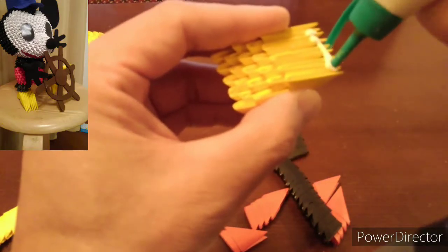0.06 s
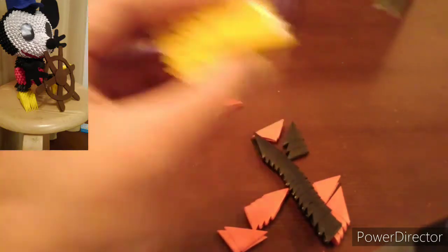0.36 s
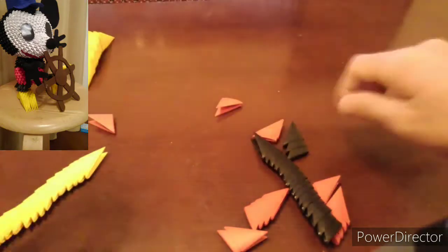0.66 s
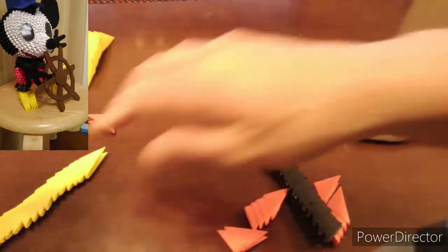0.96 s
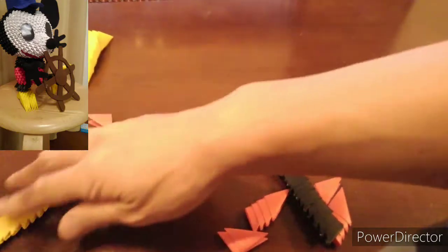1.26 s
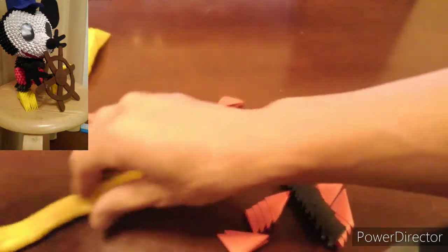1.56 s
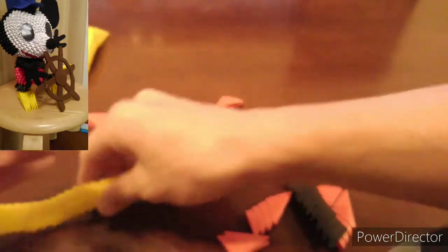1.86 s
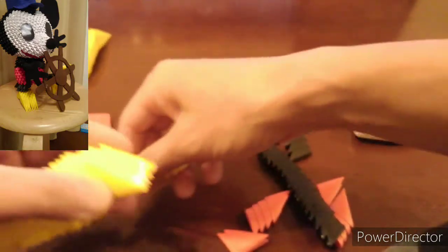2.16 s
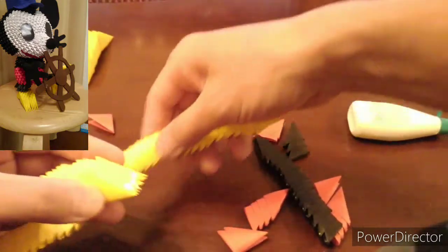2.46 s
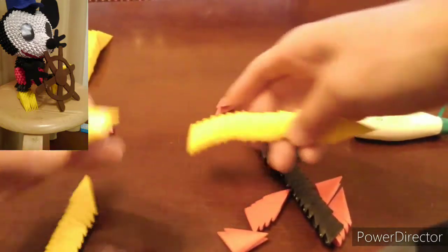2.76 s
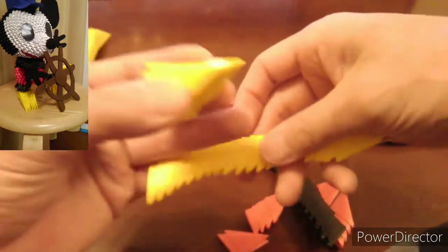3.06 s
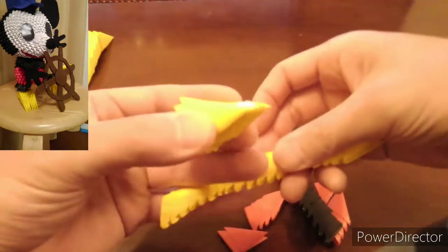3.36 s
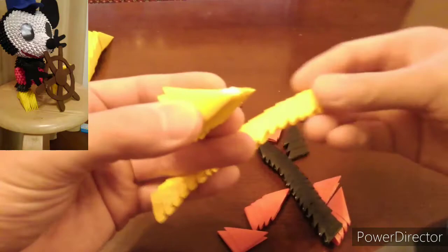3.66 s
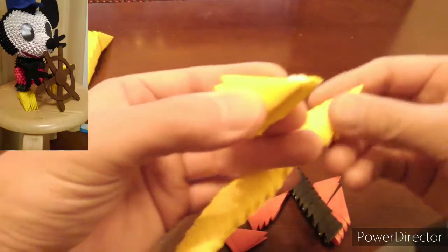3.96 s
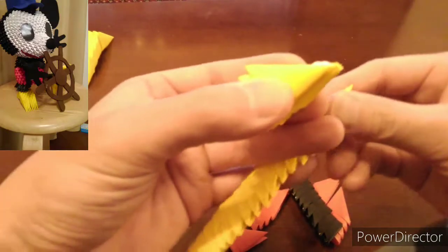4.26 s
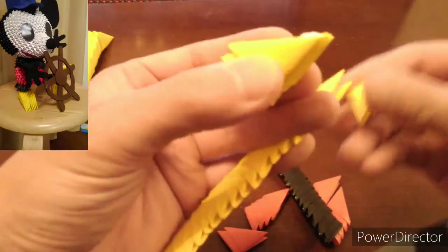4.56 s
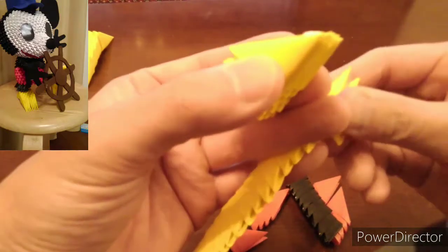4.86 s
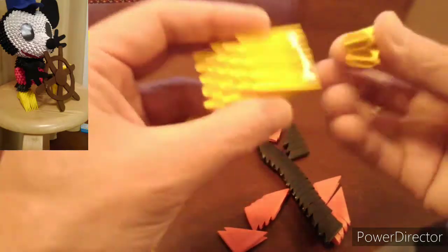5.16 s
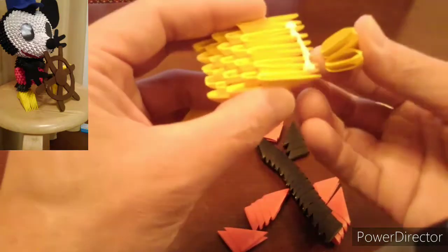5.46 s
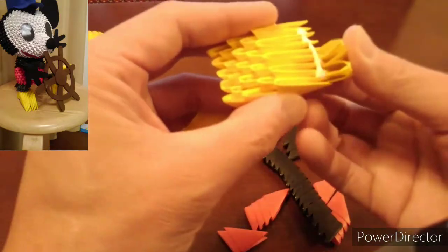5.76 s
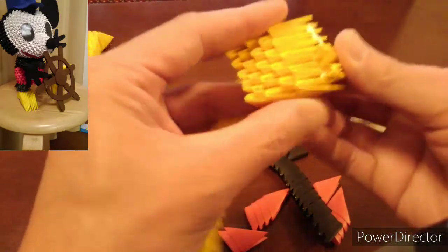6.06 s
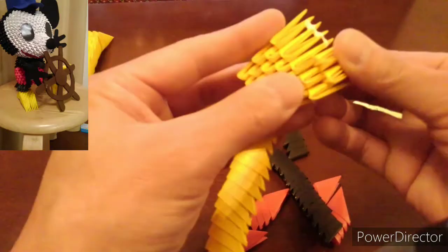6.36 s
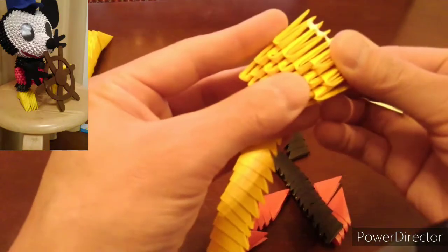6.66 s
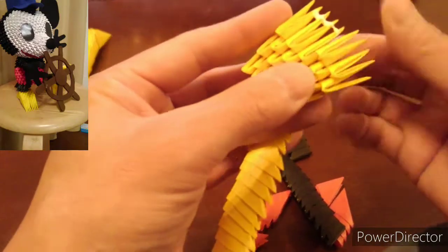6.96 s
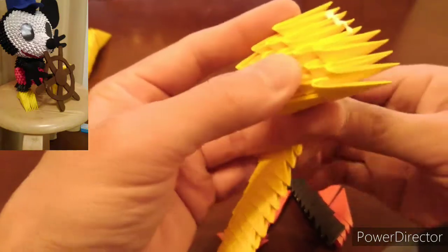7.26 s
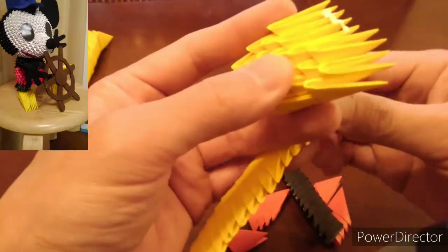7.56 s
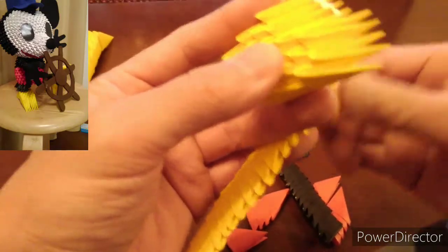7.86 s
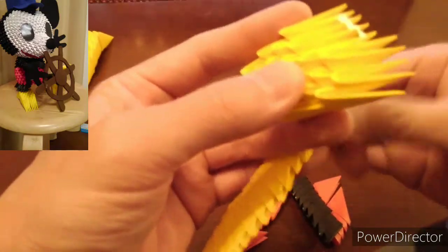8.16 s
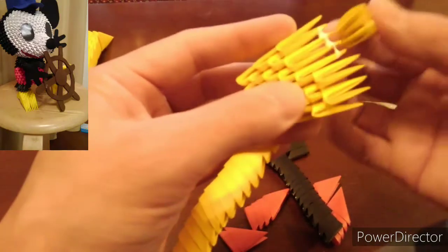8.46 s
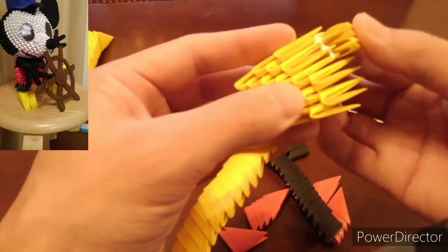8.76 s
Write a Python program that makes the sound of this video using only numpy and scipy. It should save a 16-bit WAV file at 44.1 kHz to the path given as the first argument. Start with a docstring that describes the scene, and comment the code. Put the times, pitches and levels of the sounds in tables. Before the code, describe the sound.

A faint fan rushes and whines steadily in a small room. At about 0.8 seconds a plastic glue bottle hits a wooden table with a sharp knock, the loudest sound, and rocks to rest by 1 second. From 1.2 seconds folded paper pieces click and rustle close to the microphone. Around 2 seconds a paper strip scrapes briefly across the table with soft taps, followed by low puffs of air from moving hands. A cluster of crisper clicks and dull taps comes between 2.7 and 3 seconds. Soft, short rubs and scattered ticks continue as pieces are pulled out and pushed together, with more clicks and air puffs from 4.4 to 5.2 seconds. The handling then grows quieter, with a dull tap near 6.4 seconds and very faint, thin squeaks around 7. Further small clicks and rustles come at about 7.7 and 8.3 seconds.

```python
"""Glue bottle and folded paper

A dropped plastic glue bottle cracks on a wooden table and rocks to rest, ringing its shell and the top.
A hand drags a strip of nested paper units off the table and lets it tap down, then pulls units out and
pushes them onto a paper model: fibres rub and crackle, edges click, a tight fold squeaks. Moving hands
puff air at the close microphone. A fan runs in the small room."""
import sys
import numpy as np
from scipy import signal
from scipy.fft import rfft, irfft, next_fast_len
from scipy.io import wavfile
from scipy.ndimage import uniform_filter1d, map_coordinates

SR = 44100
rng = np.random.default_rng(int(sys.argv[2]) if len(sys.argv) > 2 else 0)


def generate_wav(sig):
    """Save sig (samples, or channels by samples) to the path in sys.argv[1] as 16-bit PCM at SR."""
    pcm = np.round(np.clip(np.atleast_2d(sig).T, -1, 1) * 32767).astype(np.int16)
    wavfile.write(sys.argv[1], SR, pcm)


N = 396706

# Mid-band spectrum of paper friction. Each row: frequency in Hz, density in dB.
RASP_SPECTRUM = [(300, -19), (1000, -2.5), (2200, -0.5), (4200, 1), (6000, -1.5), (8000, -7), (9700, -16),
                 (12000, -18)]
# Treble spectrum of friction and ticks. Each row: frequency in Hz, density in dB.
SIZZLE_SPECTRUM = [(8000, -36), (10000, -15), (11200, 2), (12700, 7.5), (14000, 2), (15500, -5)]
# Paper sliding on paper or skin. Each row: start in s, length in s, rasp in dB, sizzle over rasp in dB.
STROKES = [(0.36, 0.21, -78, -2), (0.712, 0.046, -77, 3), (1.404, 0.1, -75, 0), (1.497, .14, -64, 1),
           (1.643, 0.089, -75, 1), (1.77, 0.07, -65.5, 3), (2.03, .09, -64.5, 1), (2.172, 0.19, -70.5, 2.5),
           (2.427, 0.079, -63, 0), (2.747, 0.027, -55, -10), (2.818, 0.18, -66.5, -2.5),
           (3.119, .05, -68, -2), (3.167, 0.16, -69, 2.5), (3.477, 0.07, -71.5, 1), (3.62, 0.097, -69.5, 0),
           (3.77, 0.031, -75, 3), (3.892, 0.047, -69.5, 2), (3.947, .16, -79, 6), (4.4, 0.11, -66, -0.5),
           (4.712, 0.028, -63.5, -4), (4.806, 0.021, -65.5, -2), (5, 0.11, -66.5, -1.5),
           (5.917, 0.05, -72, 1), (6.016, 0.094, -72.5, 2), (6.27, 0.038, -74.5, -1), (6.42, 0.066, -79, 1),
           (6.943, .025, -70, 0.5), (7.268, 0.054, -70, -4), (7.691, 0.081, -65, -1),
           (7.976, 0.024, -61.5, -4), (8.219, 0.081, -65.5, 0.5), (8.363, .07, -76.5, 0)]


def amp(db):
    """Decibels to gain."""
    return 10 ** (np.asarray(db) / 20)


def unit(x):
    """Scale to rms 1."""
    return x / np.sqrt(np.mean(x ** 2) + 1e-20)


def crest(x):
    """Scale the strongest millisecond to rms 1."""
    return x / np.sqrt(np.max(uniform_filter1d(x ** 2, size=44)) + 1e-20)


def along(points, hz):
    """Interpolate (Hz, value) points on a log frequency axis."""
    knots_hz, values = np.transpose(points)
    return np.interp(np.log(hz + 1), np.log(knots_hz), values)


def wobble(knots_per_s):
    """Smooth random curve."""
    return map_coordinates(rng.standard_normal(N // 20), [np.arange(N) * knots_per_s / SR], mode="wrap")


def filtered(x, response):
    """Apply a complex frequency response."""
    size = next_fast_len(len(x) + 8192)
    return irfft(rfft(x, size) * response(np.fft.rfftfreq(size, 1 / SR)), size)[:len(x)]


def coloured(x, spectrum):
    """Minimum-phase filter with the given (Hz, dB) spectrum."""
    size = 8192
    gain = amp(along(spectrum, np.fft.rfftfreq(size, 1 / SR)))
    cepstrum = irfft(np.log(gain))
    cepstrum[1:size // 2] *= 2
    cepstrum[size // 2 + 1:] = 0
    return signal.fftconvolve(x, irfft(np.exp(rfft(cepstrum))))[:len(x)]


def resonant(x, peaks):
    """Parallel resonances, each (centre Hz, width Hz, dB)."""
    return filtered(x, lambda f: sum(amp(db) * 1j * f * width / (hz * hz - f * f + 1j * f * width)
                                     for hz, width, db in peaks))


def fade(t60_s):
    """Half a second of exponential decay."""
    return np.exp(-np.log(1000) * np.arange(SR // 2) / SR / t60_s)


def burst(t60_s):
    """Decaying noise with an instant onset."""
    return fade(t60_s) * rng.standard_normal(SR // 2)


def swell(at_s, half_s):
    """Bell of gain, 1/e at half_s from its centre."""
    return np.exp(-np.minimum(((np.arange(N) / SR - at_s) / half_s) ** 2, 20))


def surge(at_s, rise_s, fall_s):
    """Gain rising exponentially to at_s, then decaying."""
    t = np.arange(N) / SR - at_s
    return np.exp(-np.minimum(np.maximum(-t / rise_s, t / fall_s), 20))


def stroke(length_s, rise_share=0.36, release_s=0.021):
    """Sliding speed: the fingers speed up, hold, let go."""
    t = np.arange(SR // 2) / SR
    return np.minimum(t / (rise_share * length_s), 1) * np.exp(-np.maximum(t - length_s, 0) / release_s)


def add(track, start_s, sound):
    """Mix a sound into the track."""
    part = track[round(start_s * SR):][:len(sound)]
    part += sound[:len(part)]


def slips(per_s, spread_db, smooth_gain):
    """Friction: tiny uneven slips over smooth sliding noise."""
    sizes = rng.standard_normal(N) * amp(spread_db * np.clip(rng.standard_normal(N), -2, 2))
    return unit(sizes * (rng.random(N) < per_s / SR)) + smooth_gain * rng.standard_normal(N)


def in_room(x, wet_db):
    """Add wall reflections, each frequency decaying at its own rate."""
    # Room decay. Each row: frequency in Hz, t60 in s.
    wall_decay = [(60, 0.29), (180, 0.68), (600, 0.5), (2000, 0.33), (5000, 0.34), (13000, 0.4)]
    hz, t, bins = signal.stft(rng.standard_normal(SR), SR, nperseg=256)
    decay = np.exp(-np.log(1000) * t / along(wall_decay, hz)[:, None])
    tail = signal.istft(bins * decay, SR, nperseg=256)[1]
    tail *= 1 - np.exp(-np.arange(len(tail)) / SR / 0.0047)  # reflections build up
    return x + amp(wet_db) * signal.fftconvolve(x, tail / np.linalg.norm(tail))[:N]


def room_tone(hum_hz=99):
    """Steady rush, a fan's fuzzy whine and faint mains hum."""
    # Background rush. Each row: frequency in Hz, density in dB.
    rush_spectrum = [(15, 2), (45, -5.5), (68, -12.5), (135, -5.5), (170, -4), (205, -16.5), (275, -12),
                     (360, -24), (1000, -25.5), (2200, -27.5), (5000, -35.5), (9700, -48), (12500, -40.5),
                     (15500, -43)]
    # Fan tones. Each row: centre in Hz, nominal width in Hz, relative level in dB.
    fan_tones = [(751.8, 26.5, -0.5), (824, 25, -9), (467.7, 6.6, -14), (1372, 3.9, -16),
                 (1530, 5.6, -16.5)]
    rush = unit(coloured(rng.standard_normal(N), rush_spectrum))
    whine = np.zeros(N)
    for hz, width_hz, db in fan_tones:
        peak = [(hz, 1.17 * width_hz, 0)]
        whine += amp(db) * unit(resonant(resonant(rng.standard_normal(N), peak), peak))
    hum = np.sin(2 * np.pi * hum_hz * np.arange(N) / SR + 1.16 * wobble(knots_per_s=12))
    return amp(-56) * rush + amp(-68) * whine + amp(-65.5) * hum


def rubbing(grip_rasp_db=-81, grip_sizzle_db=-89.5):
    """Paper fibres catch and slip: faintly in a resting grip, louder in strokes."""
    rasp, sizzle = np.full(N, amp(grip_rasp_db)), np.full(N, amp(grip_sizzle_db))
    for start_s, length_s, db, sizzle_db in STROKES:
        add(rasp, start_s, amp(db) * stroke(length_s))
        add(sizzle, start_s, amp(db + sizzle_db) * stroke(length_s))
    friction = slips(per_s=2000, spread_db=3.5, smooth_gain=0.9) * amp(1.6 * wobble(knots_per_s=70))
    # The colour shifts as the fingers cover different folds.
    bins = signal.stft(friction, nperseg=512)[2]
    folds = uniform_filter1d(rng.standard_normal(bins.shape), size=4, axis=0)
    folds = uniform_filter1d(folds, size=7, axis=1)
    folds_db = 2.5 * np.clip(unit(folds), -2, 2)
    friction = signal.istft(bins * amp(folds_db), nperseg=512)[1][:N]
    rasp *= unit(coloured(friction, RASP_SPECTRUM))
    sizzle *= unit(coloured(friction, SIZZLE_SPECTRUM))
    return in_room(rasp + sizzle, wet_db=-12)


def crackle(idle_per_s=3.0, stroke_extra_per_s=14, level_db=-64, spread_db=0.5):
    """Stray fibres tick at random, more often while paper slides."""
    ticks_per_s = np.full(N, idle_per_s)
    for start_s, length_s, _, _ in STROKES:
        add(ticks_per_s, start_s, stroke_extra_per_s * stroke(length_s))
    sizes = amp(level_db - spread_db * np.clip(rng.standard_normal(N), -2, 2))
    impulses = sizes * (rng.random(N) < ticks_per_s / SR)
    envelope = signal.fftconvolve(impulses, fade(t60_s=0.016))[:N]
    noise = rng.standard_normal(N)
    fibres = unit(coloured(noise, RASP_SPECTRUM)) + amp(-0.5) * unit(coloured(noise, SIZZLE_SPECTRUM))
    return in_room(envelope * fibres, wet_db=-10)


def clicks(t60_cycles=22):
    """A freed paper edge flicks its flap, which rings briefly under a dry tick."""
    # Edges snapping past each other. Each row: start in s, relative level in dB, flap pitch in Hz,
    # relative tick level in dB.
    snaps = [(.521, -54.5, 4000, -6.5), (1.177, -41.5, 1190, -28), (1.422, -44, 2440, -14),
             (1.432, -47, 2680, -13), (1.473, -54, 4000, -5), (1.5158, -40.5, 3120, -11.5),
             (1.6133, -35, 3500, -22), (1.622, -36, 3460, -26), (1.681, -43, 2360, -27),
             (1.775, -50, 4830, -6.5), (1.796, -46.5, 3300, -8), (2.226, -52, 2120, -6),
             (2.7354, -41, 2200, -9), (2.752, -30.5, 3600, -7.5), (2.757, -32, 1400, -9.5),
             (2.8505, -38.5, 2170, -9), (2.8528, -40.5, 3860, -10), (2.929, -40.5, 2580, -7),
             (3.5827, -53, 2970, -8), (3.728, -43, 2400, -27), (4.1287, -41.5, 2950, -34),
             (4.351, -41, 2700, -37), (4.504, -41, 1600, -13.5), (4.796, -40, 1500, -28),
             (4.802, -47, 1110, -30), (4.8134, -47, 2150, -15), (5.105, -42.5, 1980, -29),
             (5.153, -48, 2020, -17), (5.248, -55.5, 4440, -3.5), (5.9426, -58.5, 4150, -3),
             (7.3416, -56, 4300, -2.5), (7.693, -41, 2520, -30), (7.786, -43, 3060, -10),
             (8.3073, -40, 1970, -24)]
    out, t = np.zeros(N), np.arange(SR // 2) / SR
    for start_s, db, hz, tick_db in snaps:
        snap = burst(t60_s=0.016) * (1 - fade(t60_s=0.004))  # the edge lets go over about 0.5 ms
        rasp = coloured(snap, RASP_SPECTRUM)
        flap = crest(resonant(rasp, [(hz, 0.17 * hz, 0)]))
        ring = fade(t60_s=t60_cycles / hz) * np.sin(2 * np.pi * hz * t)
        tick = crest(coloured(snap, SIZZLE_SPECTRUM)) + amp(2) * crest(rasp)
        add(out, start_s, amp(db - 13) * (flap + ring + amp(tick_db + 10.5) * tick))
    return in_room(out, wet_db=-8.5)


def bottle(contact_s=0.00024):
    """Each contact cracks, rings the plastic shell and shakes the table top."""
    # Landing and rocking. Each row: start in s, then relative thud, crack and tick levels in dB.
    contacts = [(0.8169, -25, -11.5, -44), (0.8204, -26, -14.5, -60), (.825, -24, -24.5, -48),
                (0.8312, -23, -17, -57), (0.8689, -25, -24, -51), (0.9014, -23.5, -40, -72),
                (.923, -44, -34, -80), (0.96, -29.5, -34, -60), (.9844, -31, -38, -61),
                (1.0264, -43, -52, -72)]
    # Wooden top. Each row: frequency in Hz, relative level in dB, t60 in s.
    table_modes = [(41, -10.5, 0.33), (140.2, -14.5, 0.67), (177.5, 10.5, 0.055), (208.6, -16, 0.51),
                   (256.5, -7.5, 0.24), (349, -12.5, 0.21), (383, -19.5, 0.19)]
    # Plastic shell. Each row: frequency in Hz, relative level in dB, t60 in s.
    shell_modes = [(466, -16, 0.028), (609, -12, 0.13), (662, -0.5, 0.079), (867, -12, 0.07),
                   (995, -4.5, 0.026), (1554, -6.5, 0.027), (1830, -12, 0.014), (2230, -11, 0.038),
                   (2720, -20, 0.025), (2950, -21, 0.025), (3400, -12, 0.014), (3970, -14, 0.015)]
    # Hard contact. Each row: frequency in Hz, density in dB.
    crack_spectrum = [(120, 0.5), (430, 8.5), (800, 7.5), (1200, -9), (2400, -0.5), (3400, -6.5),
                      (4200, -11), (5000, -18.5), (6500, -26), (9600, -49), (15500, -33)]
    thuds, cracks, t = np.zeros(N), np.zeros(N), np.arange(SR // 2) / SR
    for start_s, thud_db, crack_db, tick_db in contacts:
        # The heavy top needs part of a cycle to get going.
        wood = sum(amp(db) * fade(t60_s) * (1 - np.exp(-3 * hz * t)) * np.sin(2 * np.pi * hz * t)
                   for hz, db, t60_s in table_modes)
        shell = sum(amp(db + rng.normal(0, 1)) * fade(t60_s) * np.sin(2 * np.pi * (hz * t + rng.random()))
                    for hz, db, t60_s in shell_modes)
        shell *= 1 - np.exp(-t / contact_s)  # the plastic yields on landing
        crack = crest(coloured(burst(t60_s=0.021), crack_spectrum))
        tick = crest(coloured(burst(t60_s=0.013), SIZZLE_SPECTRUM))
        add(thuds, start_s, amp(thud_db) * wood)
        add(cracks, start_s, amp(crack_db - 8) * (crack + amp(-1.5) * shell) + amp(tick_db) * tick)
    return in_room(thuds, wet_db=-17.5) + in_room(cracks, wet_db=-7)


def bumps():
    """The strip or a finger lands softly with a dull, hollow tap."""
    # Taps. Each row: start in s, relative level in dB, hollow pitch in Hz.
    taps = [(1.797, -49, 316), (1.979, -49, 388), (2.033, -44.5, 186), (2.039, -48, 414), (2.751, -38, 370),
            (2.85, -43.5, 353), (2.926, -45, 360), (4.791, -43.5, 226), (6.357, -44, 223),
            (7.693, -47, 290)]
    # Soft contact. Each row: frequency in Hz, density in dB.
    tap_spectrum = [(60, -50), (180, 1), (370, 3), (550, -2), (850, 1.5), (1400, -25), (2500, -20),
                    (6000, -37)]
    out, t = np.zeros(N), np.arange(SR // 2) / SR
    for start_s, db, hz in taps:
        hollow = fade(t60_s=0.065) * np.sin(2 * np.pi * hz * t)
        tap = crest(coloured(burst(t60_s=0.021), tap_spectrum))
        add(out, start_s, amp(db - 4.5) * (tap + amp(1.7) * hollow))
    return in_room(out, wet_db=-4.5)


def air_puffs():
    """Moving hands push air at the microphone."""
    # Hand movements. Each row: centre in s, half length in s, level in dB.
    puffs = [(1.867, 0.06, -48), (2.301, .05, -38), (2.412, 0.024, -41.5), (2.596, 0.044, -46),
             (3.05, 0.12, -56), (4.5, 0.039, -53), (4.8, .03, -52), (4.916, .055, -46), (5.141, .025, -47),
             (8.324, 0.064, -49.5)]
    # Low air rumble. Each row: frequency in Hz, density in dB.
    puff_spectrum = [(12, 7.5), (30, -4), (50, 0), (90, -19), (200, -36), (500, -64)]
    push = sum(amp(db) * swell(at_s, half_s) for at_s, half_s, db in puffs)
    return push * unit(coloured(rng.standard_normal(N), puff_spectrum))


def dragging(fastest_s=1.963, rise_s=0.06, fall_s=0.11, press_lag_s=0.039, catch_s=0.012):
    """The toothed strip chatters over the varnish and sounds its hollow folds."""
    # Teeth catching. Each row: time in s, level in dB.
    catches = [(1.98, -64), (2.04, -54)]
    # Fold resonances. Each row: centre in Hz, width in Hz, gain in dB.
    fold_peaks = [(390, 150, -5), (1230, 76, 11), (1860, 180, 8), (2180, 180, 8), (2670, 230, -1)]
    # Sliding hiss, filtered twice. Each row: centre in Hz, width in Hz, gain in dB, per pass.
    hiss_peaks = [(11900, 710, -6), (12300, 740, -2), (14400, 2200, -6)]
    speed = surge(fastest_s, rise_s, fall_s)
    # The hand presses harder as the pull goes on: the scrape swells later and steeper than the hiss.
    pressure = surge(fastest_s + press_lag_s, rise_s, fall_s) ** 1.07
    snags = sum(amp(db) * surge(at_s, catch_s, catch_s) for at_s, db in catches)
    friction = slips(per_s=1500, spread_db=4.5, smooth_gain=0.6) * amp(2 * wobble(knots_per_s=90))
    scrape = (amp(-58.5) * pressure + snags) * unit(resonant(friction, fold_peaks))
    hiss = amp(-55.5) * speed * unit(resonant(resonant(friction, hiss_peaks), hiss_peaks))
    return in_room(scrape + hiss, wet_db=-5)


def squeak(pitch_exponent=0.035):
    """Fast stick-slip in a tight paper pocket; pitch and level arch with the push."""
    # Thin tones. Each row: centre in s, half length in s, top pitch in Hz, level in dB.
    squeaks = [(6.86, .05, 8700, -81), (6.86, .055, 11100, -77), (7.02, 0.075, 8600, -85),
               (7.07, .05, 13300, -78)]
    out = np.zeros(N)
    for at_s, half_s, top_hz, db in squeaks:
        push = swell(at_s, half_s)
        pitch_hz = top_hz * push ** pitch_exponent * (1 + 0.003 * wobble(knots_per_s=250))
        out += amp(db) * push * np.sin(2 * np.pi * np.cumsum(pitch_hz) / SR)
    return out * amp(2.5 * wobble(knots_per_s=80))


def scene():
    """Mono mix of bottle, paper, hands and room."""
    impacts = bottle() + clicks() + bumps()
    friction = rubbing() + crackle() + squeak() + dragging()
    return (impacts + friction + air_puffs() + room_tone())[None]


def record(dry):
    """Steep low-pass at the camera's band limit."""
    cutoff_hz = 15600
    return np.array([filtered(x, lambda hz: 1 / np.sqrt(1 + (hz / cutoff_hz) ** 200)) for x in dry])


dry = scene()
out = record(dry)
generate_wav(out)
```